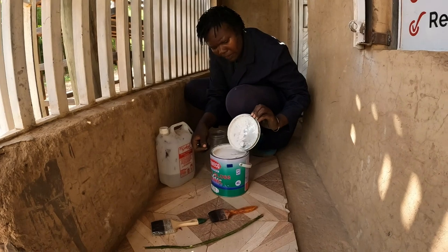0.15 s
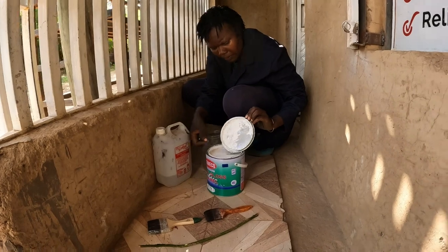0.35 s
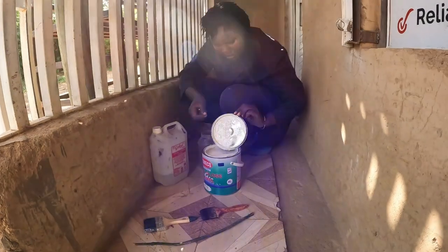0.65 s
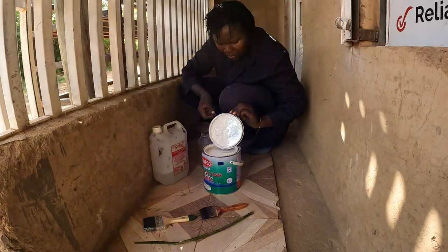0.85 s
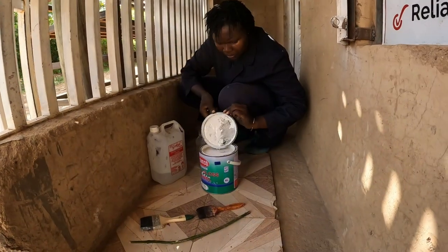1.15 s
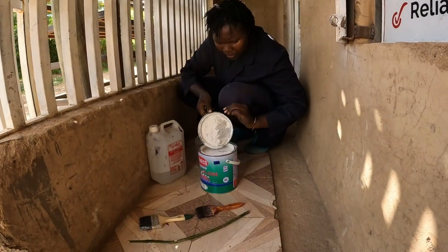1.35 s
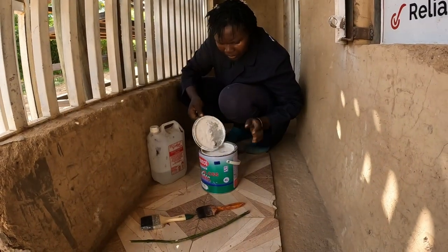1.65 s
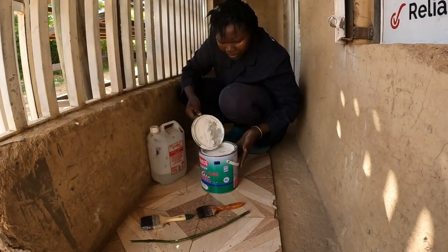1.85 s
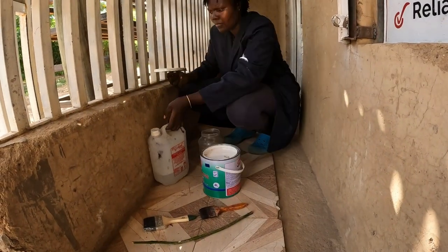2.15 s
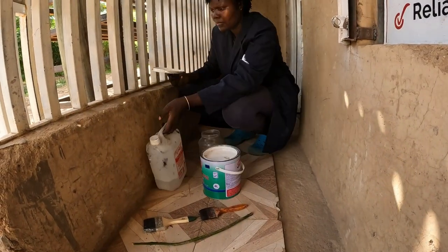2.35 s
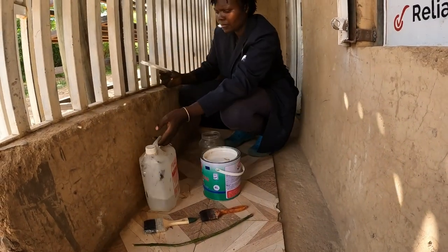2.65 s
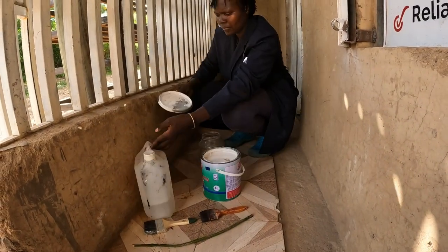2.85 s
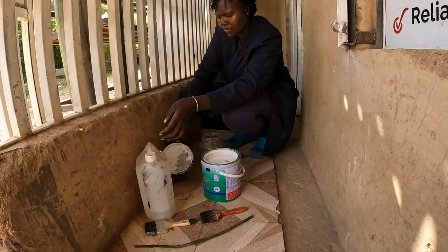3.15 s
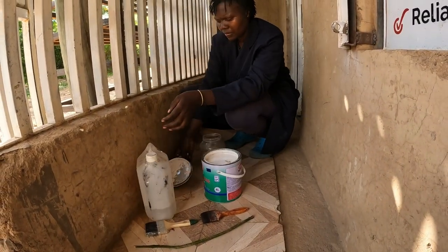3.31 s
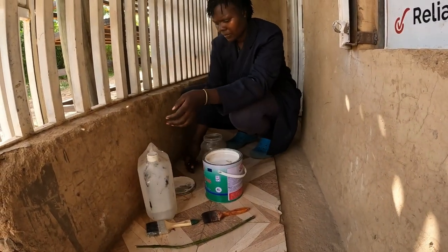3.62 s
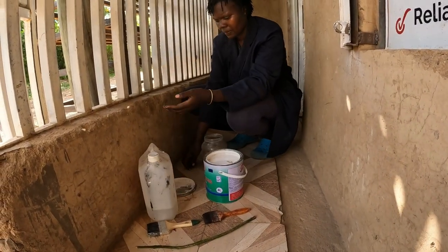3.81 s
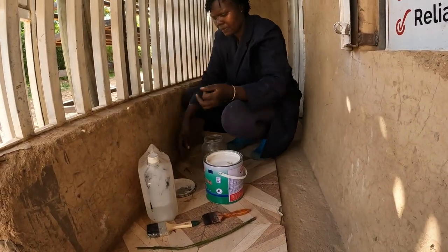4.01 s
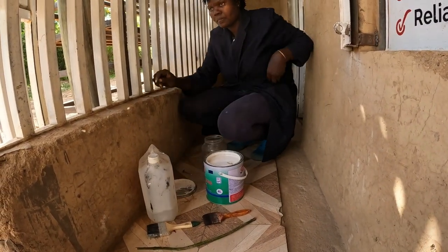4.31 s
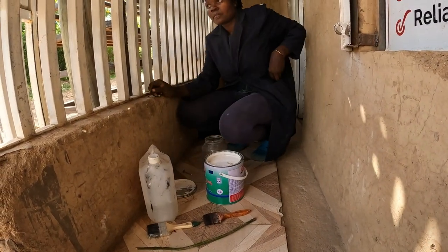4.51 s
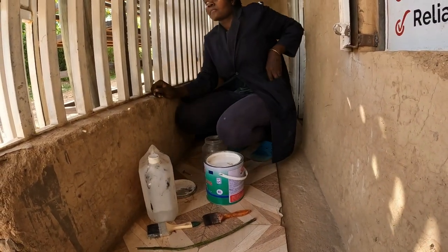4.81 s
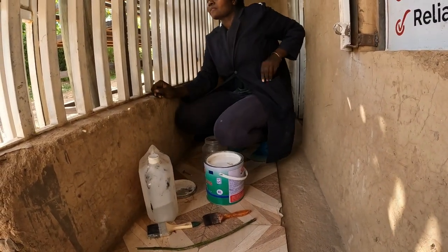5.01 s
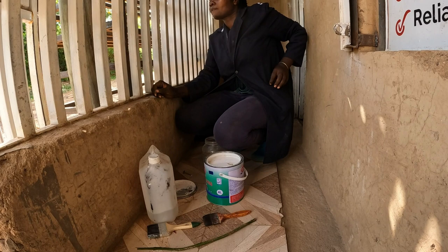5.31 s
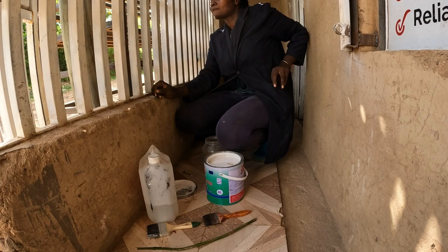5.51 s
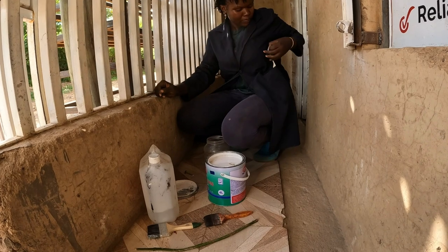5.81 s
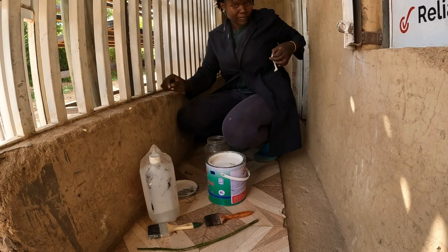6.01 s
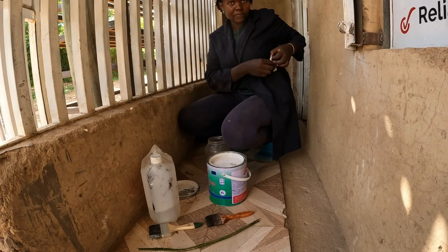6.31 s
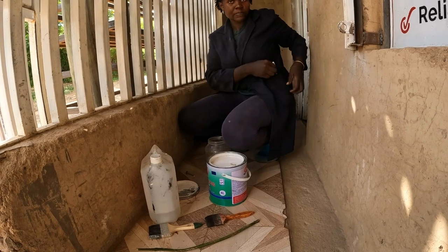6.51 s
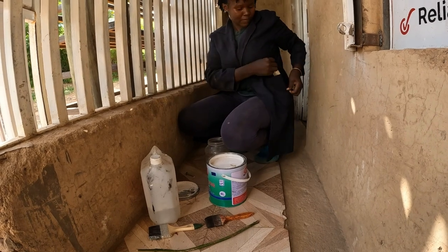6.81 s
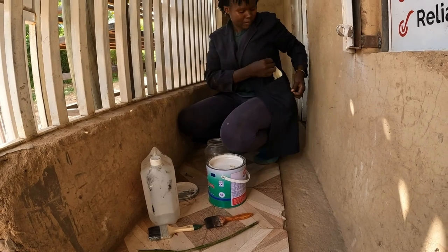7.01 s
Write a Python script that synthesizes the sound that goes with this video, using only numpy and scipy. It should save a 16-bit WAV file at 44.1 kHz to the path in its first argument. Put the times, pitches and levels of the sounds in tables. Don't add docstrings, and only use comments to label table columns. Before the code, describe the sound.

A thin metal tin lid is scraped, knocked and dropped spinning on tile, with plastic jug bumps, a clink and cloth rustle over a far engine throb.

```python
import sys
import numpy as np
from scipy import signal
from scipy.io import wavfile
from scipy.ndimage import uniform_filter1d

SR = 44100
rng = np.random.default_rng(int(sys.argv[2]) if len(sys.argv) > 2 else 0)


def amplitude_ratio(level_db):
    exponent = np.asarray(level_db, float) / 20
    return 10 ** exponent


def pcm_store(signal):
    levels = np.round(np.clip(np.atleast_2d(signal), -1, 1) * 32767)
    wavfile.write(sys.argv[1], SR, levels.astype(np.int16).T)


N = 315742

# f/Hz, level/(dB per Hz)
WASH_COLOUR = [(20, -20.5), (98, 2.5), (116, -28.5), (148, -12), (282, -27), (439, -31.5), (597, -31.5),
               (811, -40), (1070, -32), (1870, -35), (2540, -43), (7310, -47.5), (12100, -62), (15500, -86)]
# t/s, level/dB
WASH_CURVE = [(0.0, -40), (0.24, -33.5), (2.53, -39), (2.85, -44), (3.03, -36), (3.85, -38.5), (6.52, -45),
              (7.16, -42)]
# f/Hz, likeness/1
PORT_LIKENESS = [(25, 0.97), (60, 1), (180, 1.0), (550, 0.64), (1650, 0.22), (4970, 0.77), (15000, 0.51)]
# middle t/s, half length/s, level/dB
ROAD = [
    (0, 0.12, -31),
    (1.6, 1.44, -44.5),
    (3.1, 2, -54),
    (5, 1.33, -49.5),
    (7.2, 0.97, -51),
]
# t/s, cycle f/Hz, 5th order level/dB
ENGINE = [(0, 18.5, -51), (.45, 15.6, -33), (.9, 17.1, -28.5), (1.4, 17.2, -33), (1.8, 21.3, -33),
          (2.3, 15.1, -34), (2.7, 14.7, -26), (3.1, 16.2, -34), (3.5, 17.15, -27), (4.3, 17.4, -35),
          (4.6, 17.4, -26), (5.2, 17.04, -23), (5.55, 17.5, -28), (5.8, 18.7, -43), (6.7, 17.6, -30.5),
          (7.16, 17.3, -30.5)]
# multiple of the cycle/1, level/dB
ENGINE_ORDERS = [(2, -6), (3, -44), (4, -1), (6, -5), (7, -26.5), (8, -17.5), (10, -18)]
OTHER_ORDERS_DB, OTHER_ORDERS_FADE_DB_PER_S = -35, -0.08
# middle t/s, half length/s, level/dB
CICADA = [
    (2.4, 0.63, -62),
    (3.2, 0.88, -67.5),
    (4.2, 0.97, -68.5),
    (4.77, .06, -59),
]
CICADA_HZ = 9750
# t/s, chirps/1, level/dB
CRICKET = [
    (6.01, 3, -49.5),
    (6.308, 3, -54),
    (7.08, 2, -56),
]
CRICKET_HZ, CRICKET_SAG, CHIRP_GAP_S = 5500, 1.6, 0.049
# start t/s, length/s, from f/Hz, to f/Hz, level/dB
GLIDES = [
    (2.398, 0.078, 6200, 6850, -53),
    (2.315, 0.061, 8000, 7700, -61),
    (2.58, 0.14, 4900, 9200, -54),
    (3.116, .1, 5000, 9900, -58),
    (5.645, 0.155, 6020, 7060, -57),
    (5.8, 0.11, 7300, 7900, -64),
    (6.216, 0.14, 7300, 7900, -68),
    (5.885, 0.43, 2094, 2094, -55.5),
    (3.17, 0.072, 870, 1500, -46),
]
WHISTLE_SAG_DB, GLIDE_BEND = 4.5, 0.8
# f/Hz, t60/s
PORCH = [(200, 0.28), (1000, 0.18), (4000, 0.28), (12000, 0.092)]

# middle t/s, half length/s, effort level/dB, dull part level/dB
CLOTH_STROKES = [(2.18, 0.12, -45, -12), (2.36, 0.053, -62, -8), (3.25, 0.3, -49, -16),
                 (4.19, 0.075, -52, 9), (4.42, 0.055, -35, -8), (4.72, 0.29, -50.5, 7.5),
                 (4.91, 0.076, -45, 1), (5.01, 0.079, -49.5, -9), (5.2, 0.75, -72.5, 19.5),
                 (5.28, 0.075, -55, 3), (5.5, 0.062, -57.5, 6), (5.71, 0.15, -56.5, 1),
                 (5.9, 0.062, -53, -1), (6.06, 0.15, -53.5, 3), (6.45, 0.1, -55, 5.5),
                 (6.62, 0.053, -54.5, 16.5), (6.75, 0.075, -52, 17.5), (6.9, 0.065, -46.5, 4),
                 (7.04, 0.068, -52.5, 5)]
# f/Hz, level/(dB per Hz)
CLOTH_COLOUR = [(1060, -20), (1800, 2), (2230, -4.5), (3410, 0), (6530, -3.5), (12300, -22), (15500, -31)]
# f/Hz, width/Hz, level/dB
POCKET = [(1026, 170, 17.5), (1307, 100, 17)]
# middle t/s, half length/s, effort level/dB, dull part level/dB
LID_STROKES = [(.12, 0.077, -39.5, 7), (.225, 0.054, -34.5, -10), (.3, 0.077, -43, -9),
               (.55, 0.19, -47.5, -13), (.68, 0.11, -43.5, -3), (.95, 0.12, -40.5, -11),
               (1.1, 0.88, -51, 7), (1.04, 0.089, -50.5, 17), (1.155, 0.028, -44, 2), (1.3, 0.061, -38, -9),
               (1.385, 0.03, -33.5, -7), (1.418, 0.034, -36.5, -3)]
# f/Hz, level/(dB per Hz)
SKIN_COLOUR = [(1060, -60), (1800, 1.5), (2700, -2.5), (2880, 4.5), (7540, 4.5), (12300, -12.5),
               (15500, -30)]
# f/Hz, width/Hz, level/dB
LID_WHISPER = [(2456, 43, 8.5), (3440, 26, 6), (4030, 9.4, -6), (5030, 31, 12), (7330, 60, 2)]
HANDS_ON_LID_S, HANDS_ON_CLOTH_S = (.08, 1.73), (2.1, 7.16)

SNAPS = [
    (2.362, -41, -4, .015),
    (4.268, -37, -37, 0.021),
    (4.404, -29, 4, .03),
    (5.62, -42.5, 0, 0.017),
    (5.695, -37, 0, .02),
    (5.893, -45, 0, 0.016),
    (6.07, -38, 3, 0.017),
    (6.487, -35.5, 6, 0.014),
]
KEY_HITS = [
    (4.9896, -32.5, 0, .045),
]
# f/Hz, level/dB, t60/s
KEYS = [(5330, -1, 0.1), (6460, -4, 0.13), (7100, -4, .1), (7600, -8, 0.13), (9460, -11, 0.11),
        (10300, -10, 0.12)]
KNOCKS = [
    (4.728, -15.5, -18, 0.02),
    (4.751, -20.5, -28, 0.029),
    (4.78, -28, -26, .025),
    (4.809, -21.5, -30, 0.022),
    (6.599, -35, -11, 0.029),
    (6.707, -31, -31, 0.028),
    (6.9, -25, -17, 0.026),
]
MORE_KNOCKS = [
    (4.816, -23, -24, 0.022),
    (4.762, -38, -13, .015),
]
# f/Hz, level/dB, t60/s
KNOCK = [(744, 2, 0.012), (960, 10.6, 0.018)]
# f/Hz, level/(dB per Hz)
KNOCK_COLOUR = [(290, -55), (500, -36), (954, -31), (1620, -68), (1820, 6), (7450, -2.5), (15500, -54)]

TOOL_HITS = [
    (3.938, -16, -12, 0.095),
]
# f/Hz, level/dB, t60/s
TOOL = [(4176, 6, 0.25), (6740, 10.5, 0.095), (7860, -2, 0.1), (8400, -14, 0.4), (13400, -7, 0.12)]
# f/Hz, level/(dB per Hz)
TOOL_COLOUR = [(180, -100), (300, -35), (1280, 7), (1540, 2.5), (4210, -8), (4720, -17), (8010, -12.5),
               (13800, -29), (15500, -68)]
TOOL_REBOUND = [
    (4.003, -11.5, -25, 0.046),
]
# f/Hz, level/dB, t60/s
TOOL_SHAFT = [(4080, -3.5, 0.66), (6685, -4, .15), (7700, 10, 0.078), (8540, -4, 0.41), (13300, -5, 0.072)]
TOOL_BOUNCES = [
    (4.088, -11.5, -9, 0.059),
    (4.137, -18, -7, 0.08),
    (4.158, -21, 5, 0.019),
]
# f/Hz, level/dB, t60/s
TOOL_TIP = [(4230, -9, 0.27), (6840, -13, 0.23), (7840, 10, 0.082), (8300, -17, 0.14), (13570, -15, 0.11)]

JUG_HITS = [(2.5113, -13, -6, 0.05), (2.5438, -19.5, -11, 0.061), (2.5571, -22.5, -17, 0.3),
            (2.615, -23, -32, 0.035), (2.7023, -15, -38, 0.036), (2.709, -5.5, -6, 0.26),
            (2.7338, -2.5, 15, 0.025), (2.793, -10, -16, 0.72), (2.836, -13, -3, 0.55),
            (2.8831, -8, -11, 0.23), (2.9143, -2, -18, 0.1), (2.9687, -16.5, -17, 0.052),
            (2.9948, -24.5, 0, 0.02)]
# f/Hz, level/dB, t60/s
JUG = [(550.4, 2, 0.1), (931, 8, 0.068), (1220, 16, 0.027), (1800, -14, 0.12)]
# f/Hz, level/(dB per Hz)
JUG_COLOUR = [(210, -32), (350, -2), (581, -3), (786, -8), (1370, -7), (3070, -16), (7590, -17),
              (12000, -29), (15500, -47)]
# top t/s, fade/s, wall level/dB, slosh level/dB, wall resonance f/Hz
DRAG = [
    (2.526, 0.18, -32, 4.5, 268),
    (2.712, 0.11, -19.5, 0, 280),
    (2.802, 0.18, -28, 11, 229),
    (2.893, 0.048, -11.5, -12, 224),
    (2.925, 0.091, -20, 1.5, 286),
    (2.97, 0.036, -30, 10, 305),
]
JERK_SUDDENNESS = 9
# t/s, level/dB, f/Hz, t60/s
THUMPS = [(1.736, -12, 258, .24), (1.735, -9, 180, .07), (0, -26, 262, .2), (3.501, -16, 1214, .8),
          (1.735, -24, 690, .2), (1.948, -27, 250, .15), (.992, -39, 365, .9), (.995, -32.5, 1040, .45),
          (3.13, -46, 430, .95), (2.711, -9.5, 272, .17), (2.915, -13, 250, .09), (2.928, -12.5, 292, .17),
          (2.8, -25, 560, .2), (2.755, -25, 535, .08), (2.92, -22, 570, .16), (2.922, -24, 1370, .08),
          (3.503, -24, 260, .2), (3.76, -42, 430, .5), (3.6, -29, 135, .3), (4.73, -38, 370, .08),
          (5.5, -41, 310, .3)]

LID_LIFT = [
    (0, -3.5, -3.5, 0.59),
    (.1, -21, -12, 0.017),
]
LID_TICKS = [
    (.913, -29, 2, 0.013),
    (.992, -17.5, 18, 0.013),
    (1.127, -16.5, -3, 0.004),
    (1.202, -19, -7, 0.0042),
]
# f/Hz, level/dB, t60/s
LID_ON_RIM = [(897, -3.5, 0.28), (994, -2.5, 0.22), (1042, -8, 0.59), (1100, -7, 0.15), (1232, -4.5, 0.5),
              (1523, -6, 0.34), (1602, -0.5, 0.2), (1645, -6.5, 0.16), (1724, -5, 0.31), (1845, -9, .2),
              (2390, -9.5, 0.17), (2780, -17, 0.14)]
LID_HITS = [
    (1.732, -0.5, 8, 0.2),
]
# f/Hz, level/dB, t60/s
LID_HELD = [(686, -22, 0.7), (892, -10.5, 0.98), (1134, -4.5, 0.45), (1263, 9, 0.037), (1517, -16.5, 0.99),
            (1577, -10.5, 0.57), (1990, -2.5, 0.24), (2450, -7, 0.1), (2610, -7, 0.2), (3110, -24, .25),
            (3776, -21, 0.62), (4290, -19, 0.41), (4530, -13, 0.18), (5636, -14, 0.31)]
# f/Hz, level/(dB per Hz)
LID_COLOUR = [(260, -98), (450, -6), (587, -14), (1210, -6.5), (1330, -3.5), (1520, -4.5), (2130, -16),
              (3970, -17.5), (9940, -27), (15500, -55)]
LID_HITS_AGAIN = [
    (1.947, -3.5, -10, 0.067),
    (1.975, -6.5, -11, 0.1),
    (2.12, -15, -3, 0.002),
    (2.165, -45, -20, .012),
    (2.19, -23.5, 0, 0.0032),
    (2.273, -29.5, -36, 0.0057),
]
# f/Hz, level/dB, t60/s
LID_TURNED = [(666, -10, 1), (894, -11.5, 0.66), (1033, -4, 1), (1214, 3, 0.6), (1500, 1, 0.95),
              (1733, -3.5, 0.48), (1855, -7.5, .4), (2380, -2.5, 0.26), (2110, -7, 0.28),
              (3140, -13.5, .35), (3565, -11, 1), (4020, -9, 0.33), (4560, -13.5, 0.21), (5631, -15, 0.2)]
# f/Hz, level/(dB per Hz)
TURNED_COLOUR = [(260, -98), (450, -20), (1100, -6), (1520, 0), (2400, -12.5), (4000, -12), (8000, -20),
                 (15500, -64)]
LID_DROP = [
    (3.4995, -8, -15, 0.14),
    (3.5, -24, 6, 0.0038),
]
# f/Hz, level/dB, t60/s
LID_ON_TILE = [(674, -10.5, 0.68), (773, -2, 0.3), (899, -4, 0.54), (1034, -2.5, 0.65), (1130, -5, 0.44),
               (1380, -8, 0.33), (1250, -4, 0.76), (1491, -9, 0.48), (1652, -14, 0.72), (1730, 1, 0.75),
               (1820, -25, 1), (2400, -24.5, 0.41), (2566, -7, .4)]
# f/Hz, level/(dB per Hz)
TILE_COLOUR = [(260, -86), (500, -18), (1210, -9), (1700, -12.5), (2600, -24), (6500, -24.5), (9940, -26),
               (15500, -54)]
RIM_CLINK = [
    (3.578, -30, 0, .03),
    (3.601, -15, 0, 0.06),
]
# f/Hz, level/dB, t60/s
RIM = [(4470, -7.5, 0.26), (5300, -15, 0.36), (5350, -4.5, 0.68), (6460, -1, .06), (6700, 6, .06)]
# f/Hz, level/(dB per Hz)
RIM_COLOUR = [(900, -21), (2400, -7), (4000, -13), (6500, -10), (9940, -12), (15500, -40)]
LID_SPIN = [
    (3.662, -1.5, -11, 0.0042),
    (3.676, -8.5, 1, 0.033),
    (3.69, -12, -2, 0.03),
    (3.707, -10.5, -9, 0.035),
    (3.722, -14.5, -16, 0.042),
    (3.742, -12, -4, 0.036),
    (3.765, -18.5, -12, 0.046),
    (3.785, -23.5, -13, 0.1),
]
# f/Hz, level/dB, t60/s
LID_SPINNING = [(951, -2, 0.21), (1230, -10.5, 1), (1480, 1, .5), (1550, 6, 0.23), (1920, 6, .26),
                (2360, -5.5, 0.145), (2590, -8, .26), (2720, -3, .3), (3200, -20, .26), (3634, -10, .32),
                (3957, 4, .27), (4180, -11.5, 0.27), (4440, -12, 0.17), (5030, -20, 0.36)]
# f/Hz, level/(dB per Hz)
SPIN_COLOUR = [(450, -25.5), (1100, -0.5), (1600, 4), (2600, 0), (4200, -3.5), (9940, -19), (15500, -44)]
CRACKS = [
    (1.947, -15, 0, .04),
    (3.5002, -10, 0, .045),
    (3.664, -14, 0, .1),
    (3.707, -18, 0, .04),
    (2.1195, -24, -3, .07),
]
# f/Hz, level/dB, t60/s
CRACK = [(6710, 7, 0.044), (7980, -7, 0.037), (9170, -12, 0.025)]
# f/Hz, level/(dB per Hz)
CRACK_COLOUR = [(1500, -25), (4500, -22), (6500, 3.5), (10500, 0.5), (13000, -14), (15500, -34)]
SOFTENING = 0.026

# f/Hz, left minus right level/dB
PORTS = [(60, 0), (150, -1.5), (380, 1), (950, 1.5), (2380, -1.2), (5980, 0), (15000, 4.5)]
EDGE_HZ = 15350


def evened(x):
    return x / np.sqrt(np.mean(x ** 2) + 1e-20)


def peaked(x):
    return x / np.sqrt(uniform_filter1d(x ** 2, 200).max())


def read(points, hz):
    f, value = np.transpose(points)
    return np.interp(np.log(hz + 1), np.log(f + 1), value)


def curves(rows, t):
    s, *columns = np.transpose(rows)
    return [np.interp(t, s, c) for c in columns]


def swells(rows, t, sudden=1):
    s, half, db, *more = np.transpose(rows)[:, :, None]
    coarse = t[::32]
    away = (coarse - s) / half * np.where(coarse < s, sudden, 1)
    power = amplitude_ratio(db - 20 * away ** 2) ** 2
    levels = [np.sqrt((power * amplitude_ratio(2 * part_db)).sum(0)) for part_db in [0, *more[:1]]]
    return [np.interp(t, coarse, level) for level in levels]


def add(mix, s, sound):
    part = mix[..., round(s * SR):][..., :sound.shape[-1]]
    part += sound[..., :part.shape[-1]]


def causal(points):
    db = read(points, abs(np.fft.fftfreq(4096, 1 / SR)))
    log_gain = np.log(amplitude_ratio(np.maximum(db, -100)))
    return np.fft.ifft(np.exp(np.conj(signal.hilbert(log_gain)))).real[:2048]


def resonate(x, hz, width):
    turn = np.exp(2j * np.pi * np.cumsum(hz * np.ones(len(x))) / SR)
    r = np.exp(-np.pi * width / SR)
    return 2 * (turn * signal.lfilter([1 - r], [1, -r], x / turn)).real


def drift(count, width):
    return evened(uniform_filter1d(uniform_filter1d(rng.standard_normal(count), width), width))


def grains(shape, spread_db):
    size_db = spread_db * np.minimum(rng.exponential(1, shape), 5)
    return evened(rng.standard_normal(shape) * amplitude_ratio(size_db))


def ring(db, hz, t60, t):
    return amplitude_ratio(db - 60 * t / np.clip(t60, .01, .95)) * np.sin(2 * np.pi * hz * t)


def tilt(x, treble_db):
    dull = signal.lfilter([.3], [1, -.7], x)
    return dull + amplitude_ratio(treble_db) * (x - dull)


def wash():
    frames, hz = N // 512 + 5, np.fft.rfftfreq(2048, 1 / SR)
    a, b, c, d, patches = rng.standard_normal((frames, 1025, 5)).T
    patches = evened(uniform_filter1d(uniform_filter1d(patches, 8, 0), 8, 1))
    same = np.clip(read(PORT_LIKENESS, hz), -1, 1)[:, None]
    left = a + 1j * b
    right = same * left + np.sqrt(1 - same ** 2) * (c + 1j * d)
    z = np.array([left, right]) * amplitude_ratio(read(WASH_COLOUR, hz)[:, None] + 2.5 * patches)
    x = evened(signal.istft(z, nperseg=2048, noverlap=1536)[1][:, :N])
    return amplitude_ratio(curves(WASH_CURVE, np.arange(N) / SR)[0] + 6.5) * x


def road():
    drone = evened(resonate(resonate(rng.standard_normal(N), 339, 110), 245, 290))
    return amplitude_ratio(-0.5) * swells(ROAD, np.arange(N) / SR)[0] * drone


def engine():
    t = np.arange(N) / SR
    hz, main_db = curves(ENGINE, t)
    rest_db = OTHER_ORDERS_DB - OTHER_ORDERS_FADE_DB_PER_S * t
    turns = np.cumsum(hz) / SR
    out = amplitude_ratio(main_db + 1.5 * drift(N, 6000)) * np.sin(2 * np.pi * (5 * turns + .09 * drift(N, 3000)))
    for k, db in ENGINE_ORDERS:
        level = amplitude_ratio(rest_db + db + 2.9 * drift(N, 6000))
        phase = round(k) * turns + 0.054 * drift(N, 9000) + rng.random()
        out += level * np.sin(2 * np.pi * phase)
    return np.sqrt(2) * out


def cicada():
    buzz = resonate(resonate(rng.standard_normal(N), CICADA_HZ, 500), CICADA_HZ, 500)
    return swells(CICADA, np.arange(N) / SR)[0] * evened(buzz)


def cricket():
    out, t = np.zeros(N), np.arange(1500) / SR
    for s, chirps, db in CRICKET:
        for k in range(round(chirps)):
            swell = np.hanning(len(t)) * (1 + 0.4 * drift(len(t), 25))
            tone = np.sin(2 * np.pi * CRICKET_HZ * t * (1 - CRICKET_SAG * t))
            add(out, s + k * CHIRP_GAP_S, amplitude_ratio(db) * swell * tone)
    return out


def glides():
    out = np.zeros(N)
    for s, length, from_hz, to_hz, db in GLIDES:
        u = np.arange(0, length, 1 / SR) / length
        waver, flicker = drift(SR // 2, 200)[:len(u)], drift(SR // 2, 300)[:len(u)]
        hz = from_hz + (to_hz - from_hz) * (u ** GLIDE_BEND + 0.053 * waver)
        tone = np.sin(2 * np.pi * np.cumsum(hz) / SR)
        level = np.sqrt(2) * amplitude_ratio(db - WHISTLE_SAG_DB * u + 1.0 * flicker)
        add(out, s, level * tone * signal.windows.tukey(len(u), .2))
    return out


def porch(x):
    taps = np.zeros((2, SR // 2))
    at = np.arange(100, SR // 2 - 20, 20)
    at = at + rng.integers(0, 20, (2, len(at)))
    np.put_along_axis(taps, at, rng.choice([-1., 1.], at.shape), 1)
    hz, t, z = signal.stft(taps, SR, nperseg=256)
    z[1] += (z[0] - z[1]) / (1 + (hz[:, None] / 2500) ** 2)
    tail = signal.istft(z * amplitude_ratio(-60 * t / read(PORCH, hz)[:, None]), SR, nperseg=256)[1]
    return signal.fftconvolve(x[None], tail / np.linalg.norm(tail[0]), axes=1)[:, :N]


def rub(rows, colour, lines, lines_db, span):
    t = np.arange(*span, 1 / SR)
    effort, dullness = swells(rows, t)
    near = grains(len(t), 2.36) * amplitude_ratio(2.8 * drift(len(t), 150))
    apart = rng.standard_normal((2, len(t)))
    hiss = signal.oaconvolve(near + 0.85 * apart, causal(colour)[None], axes=1)[:, :len(t)]
    dull, sung = (evened(sum(amplitude_ratio(db) * resonate(near, hz, width) for hz, width, db in modes))
                  for modes in (POCKET, lines))
    x = effort * (evened(hiss) + amplitude_ratio(lines_db) * sung) + dullness * amplitude_ratio(-4.5) * dull
    out = np.zeros((2, N))
    add(out, t[0], x * signal.windows.tukey(len(t), .02))
    return out


def blows(rows, modes, colour, ring_db, tick_db, stop_db, rise_s, t60_s=None, damped_s=None,
          count=0, plate_db=-6, flutter_db=0, dulling_db_per_s=230):
    out, t, body = np.zeros((2, N)), np.arange(SR // 3) / SR, causal(colour)
    crowd_hz = np.exp(rng.uniform(np.log(900), np.log(6500), count))
    for s, db, treble_db, length in rows:
        t60, damped = t60_s or length, damped_s or length
        onset = 1 - np.exp(-t / (rise_s * amplitude_ratio(-SOFTENING * treble_db)))
        rattle_db = 2.9 * drift(len(t), 120) - 60 * t / max(t60, .005)
        rattle = grains(len(t), 1.55) * amplitude_ratio(rattle_db) * onset
        rattle[:40] += amplitude_ratio(tick_db) * rng.standard_normal(40)
        x = signal.fftconvolve(rattle, body)[:len(t)]
        x = peaked(tilt(x, 5.5 - dulling_db_per_s * t))
        rung = 0
        for hz, mode_db, mode_t60 in modes:
            spot_db = 1.3 * rng.standard_normal()
            level_db = mode_db + spot_db + flutter_db * drift(len(t), 300)
            rung = rung + ring(level_db, hz, mode_t60, t + rng.random() / hz)
        x += amplitude_ratio(ring_db) * peaked(rung * onset)
        if count:
            crowd = sum(ring(.5 * read(colour, hz), hz, 0.5 * t60, t + rng.random() / hz) for hz in crowd_hz)
            x += amplitude_ratio(plate_db) * peaked(crowd) * onset
        x = amplitude_ratio(db - 8.0) * peaked(tilt(x, treble_db + 10.5))
        x *= amplitude_ratio(-stop_db * np.maximum(t - damped, 0))
        echo = np.roll(x, 6) - x
        add(out, s, np.roll(x, 3) + 0.27 * np.array([[1], [-1]]) * echo)
    return out


def cloth_and_keys():
    out = blows(SNAPS, KEYS, CLOTH_COLOUR, ring_db=-12.5, tick_db=-6, stop_db=900, rise_s=0.002, damped_s=.03)
    return out + blows(KEY_HITS, KEYS, CLOTH_COLOUR, ring_db=6, tick_db=5, stop_db=600, rise_s=.004, t60_s=.03)


def pocket_knocks():
    return blows(KNOCKS, KNOCK, KNOCK_COLOUR, ring_db=5.5, tick_db=7, stop_db=2000, rise_s=0.00023, damped_s=0.011)


def more_pocket_knocks():
    return blows(MORE_KNOCKS, KNOCK, KNOCK_COLOUR, ring_db=4.0, tick_db=0.0, stop_db=1500,
                 rise_s=0.00063, damped_s=.008)


def tool():
    out = blows(TOOL_HITS, TOOL, TOOL_COLOUR, ring_db=-2.0, tick_db=13.0, stop_db=907,
                rise_s=0.0016, damped_s=0.065, flutter_db=1.0)
    out += blows(TOOL_REBOUND, TOOL_SHAFT, TOOL_COLOUR, ring_db=-8.5, tick_db=-4.0, stop_db=900,
                 rise_s=0.0012, damped_s=0.085, flutter_db=1.0)
    return out + blows(TOOL_BOUNCES, TOOL_TIP, TOOL_COLOUR, ring_db=-1.5, tick_db=0.0, stop_db=600,
                       rise_s=0.00056, damped_s=0.037, flutter_db=7.0)


def jug_drag():
    out, t = np.zeros(N), np.arange(2.45, 3.1, 1 / SR)
    drum, wave = swells(DRAG, t, JERK_SUDDENNESS)
    s, *_, jerk_hz = np.transpose(DRAG)
    latest = np.maximum(np.searchsorted(s, t) - 1, 0)
    hz = uniform_filter1d(jerk_hz[latest], size=800)
    slips = grains(len(t), 4.1)
    wall = evened(resonate(resonate(slips, hz, 26), hz, 70))
    wall = evened(wall / uniform_filter1d(abs(wall), 1300) ** 0.33)
    slosh = evened(resonate(resonate(slips, 146, 86), 126, 54))
    slosh = evened(slosh / uniform_filter1d(abs(slosh), 1300) ** 1.86)
    add(out, t[0], drum * wall + wave * slosh)
    return out


def jug_bumps():
    return blows(JUG_HITS, JUG, JUG_COLOUR, ring_db=-4.5, tick_db=-3.5, stop_db=900,
                 rise_s=0.0022, damped_s=0.092, flutter_db=7.5)


def thumps():
    out, t = np.zeros(N), np.arange(SR // 2) / SR
    for s, *mode in THUMPS:
        add(out, s, ring(*mode, t))
    return out


def lid_cracks():
    return blows(CRACKS, CRACK, CRACK_COLOUR, ring_db=-6, tick_db=-11, stop_db=900, rise_s=.0006, damped_s=0.027)


def lid_in_hand():
    out = blows(LID_LIFT, LID_ON_RIM, LID_COLOUR, ring_db=7, tick_db=3, stop_db=900, rise_s=.01,
                count=60, plate_db=-4, flutter_db=2.6)
    out += blows(LID_TICKS, LID_ON_RIM, LID_COLOUR, ring_db=-9.5, tick_db=-12, stop_db=900,
                 rise_s=0.00093, damped_s=0.011)
    out += blows(LID_HITS, LID_HELD, LID_COLOUR, ring_db=-1.5, tick_db=10, stop_db=1500, rise_s=.0015, t60_s=.66,
                 count=120, plate_db=-2, flutter_db=3, dulling_db_per_s=110)
    return out + blows(LID_HITS_AGAIN, LID_TURNED, TURNED_COLOUR, ring_db=1.5, tick_db=10, stop_db=900,
                       rise_s=0.0013, t60_s=1, count=50, plate_db=-2.5, flutter_db=3)


def lid_on_floor():
    out = blows(LID_DROP, LID_ON_TILE, TILE_COLOUR, ring_db=-.5, tick_db=8, stop_db=250, rise_s=.0008, t60_s=1,
                count=60, plate_db=-6, flutter_db=3.5)
    out += blows(RIM_CLINK, RIM, RIM_COLOUR, ring_db=-1.5, tick_db=0, stop_db=400, rise_s=.003, t60_s=.3, flutter_db=4)
    return out + blows(LID_SPIN, LID_SPINNING, SPIN_COLOUR, ring_db=-6, tick_db=0.5, stop_db=499,
                       rise_s=0.0011, t60_s=0.41, count=30, plate_db=-15, flutter_db=-4)


def scene():
    street = wash() + road() + engine() + cicada()
    near = cricket() + glides() + cloth_and_keys() + tool()
    near += jug_drag() + jug_bumps() + thumps()
    near += lid_in_hand() + lid_on_floor()
    knocks = pocket_knocks()
    echoes = porch((near + amplitude_ratio(-2.5) * knocks).mean(0))
    hands = rub(CLOTH_STROKES, CLOTH_COLOUR, POCKET, lines_db=-36.0, span=HANDS_ON_CLOTH_S)
    hands += rub(LID_STROKES, SKIN_COLOUR, LID_WHISPER, lines_db=-7.5, span=HANDS_ON_LID_S)
    close = hands + knocks + more_pocket_knocks() + lid_cracks()
    return street + near + amplitude_ratio(-8.5) * echoes + close


def band_limit(x):
    return signal.sosfilt(signal.butter(12, 15800, fs=SR, output="sos"), x)


def record(dry):
    ports = np.array([causal([(hz, side * db / 2) for hz, db in PORTS]) for side in (1, -1)])
    x = signal.oaconvolve(dry, ports, axes=1)[:, :N]
    x = np.tanh(x * 0.9) / 0.9
    x = signal.oaconvolve(x, signal.firwin(255, EDGE_HZ, fs=SR)[None], "same")
    return band_limit(x)


dry = scene()
out = record(dry)
pcm_store(out)
```